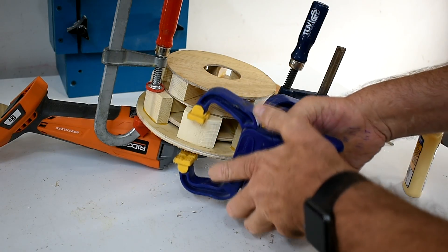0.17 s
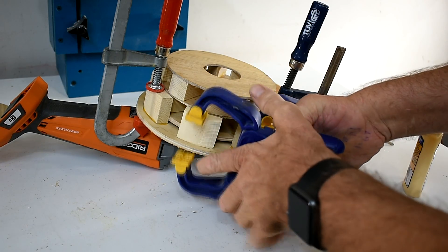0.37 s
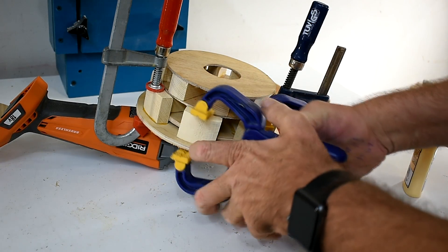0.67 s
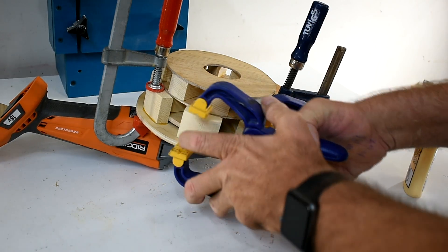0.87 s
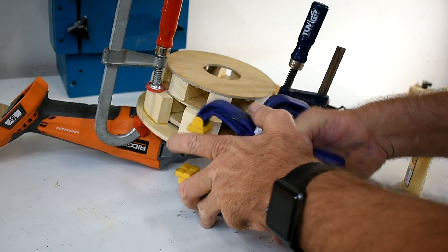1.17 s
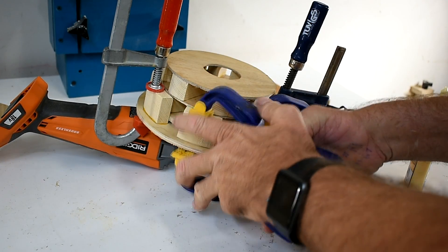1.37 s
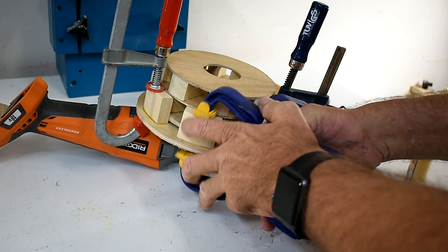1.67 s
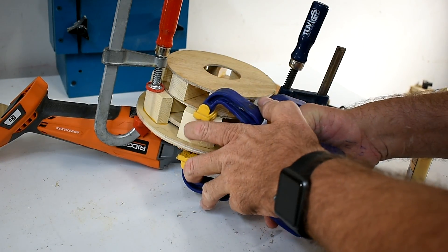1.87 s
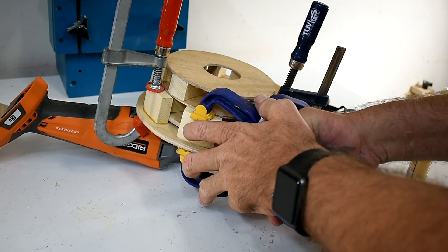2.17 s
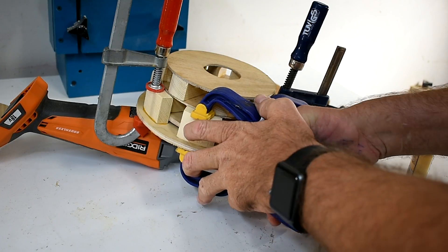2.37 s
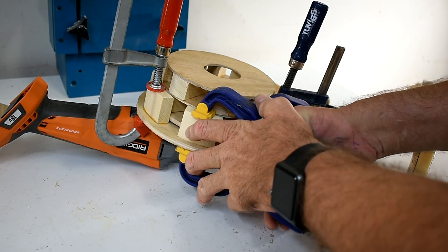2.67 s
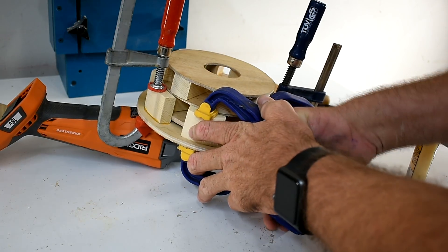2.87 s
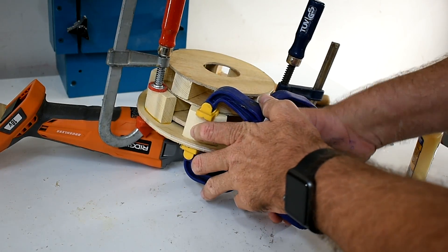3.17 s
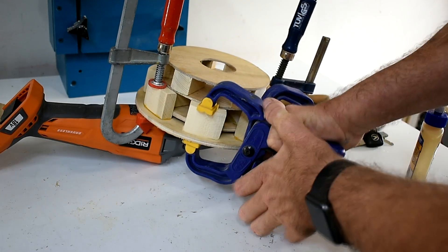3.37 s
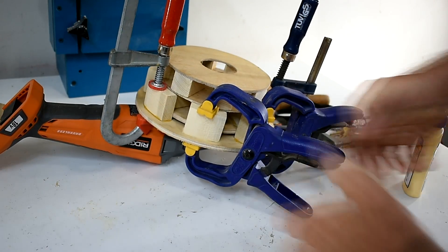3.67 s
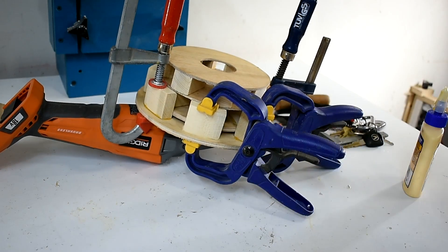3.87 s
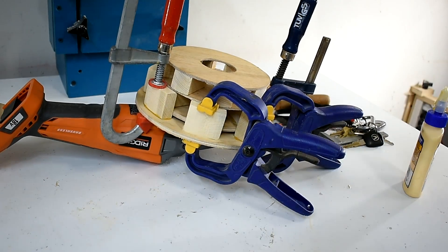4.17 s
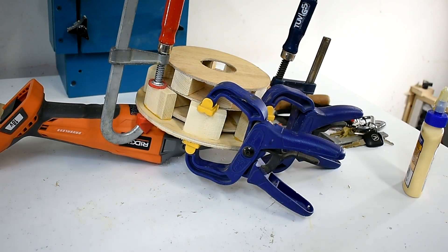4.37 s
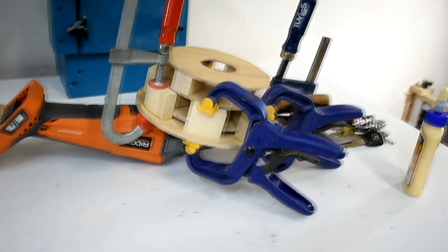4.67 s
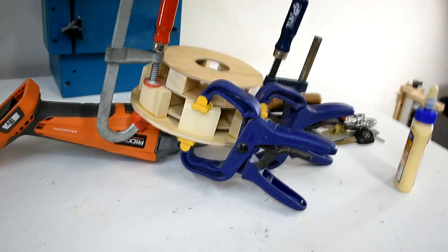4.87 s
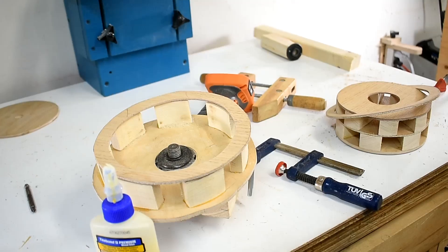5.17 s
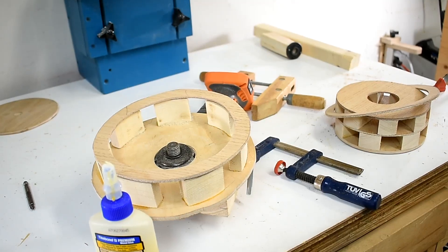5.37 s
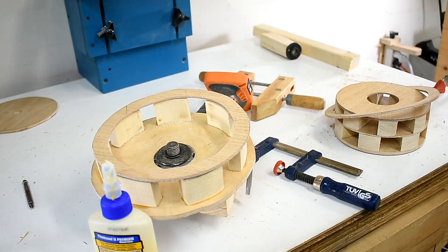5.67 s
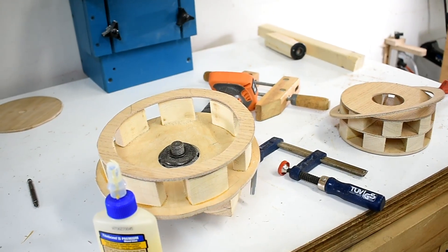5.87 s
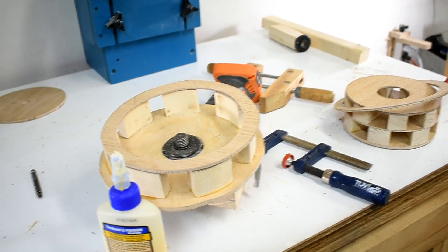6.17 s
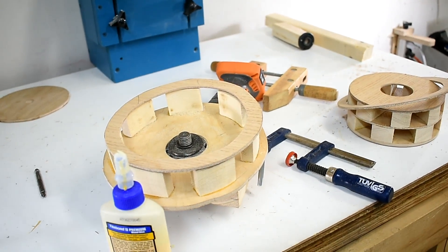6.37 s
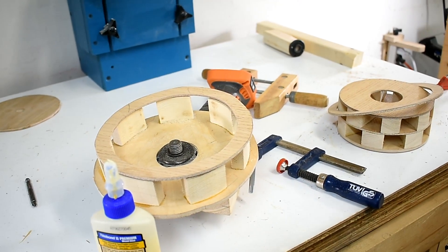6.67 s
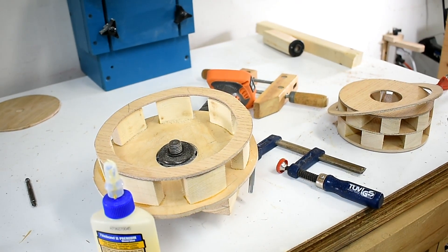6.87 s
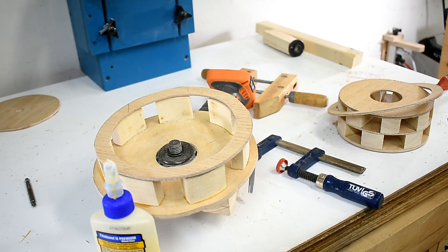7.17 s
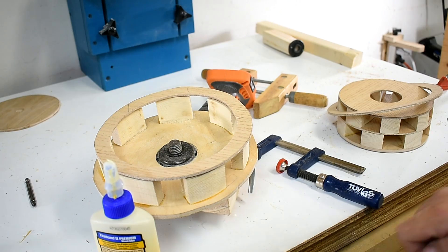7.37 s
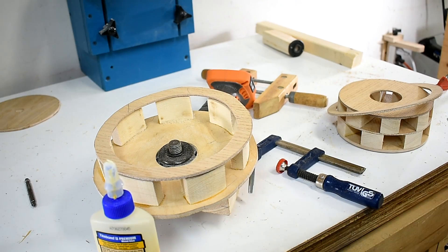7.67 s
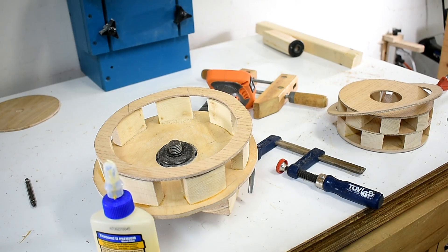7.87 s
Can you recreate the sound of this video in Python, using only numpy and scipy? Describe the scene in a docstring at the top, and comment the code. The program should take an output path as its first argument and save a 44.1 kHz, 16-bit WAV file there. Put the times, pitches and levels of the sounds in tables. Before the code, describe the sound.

Soft handling knocks on wood, one sharp clamp snap and a loud close rattle, then ticks and shuffling in a quiet workshop.

```python
"""Plastic hand clamps are set on a glued wooden wheel in a small workshop, over a faint room hum.
Jaws bump the wood, pads scrape, hands rub; at 2.1 s one clamp snaps home, tooth by tooth.
At 4.7 s something hard is bumped and rattles close to the microphone, jolting its stand.
At 5.15 s the reverberation stops dead and the hum changes colour.
Light ticks, dull knocks and shuffling follow."""
import sys
import numpy as np
from scipy import signal
from scipy.fft import rfft, irfft, next_fast_len
from scipy.io import wavfile
from scipy.ndimage import uniform_filter1d

SR = 44100
rng = np.random.default_rng(int(sys.argv[2]) if len(sys.argv) > 2 else 0)


def master(y):
    """Save y as 16-bit WAV."""
    cut = np.clip(np.atleast_2d(y).T, -1, 1)
    pcm = np.round(cut * 32767)  # scale
    wavfile.write(sys.argv[1], SR, pcm.astype(np.int16))


N = 353373
TIME = np.arange(N) / SR


def from_db(db):
    """Decibels to gain."""
    return 10 ** (np.asarray(db) / 20)


def unit_rms(x):
    """Scale to unit power."""
    return x / np.sqrt(np.mean(x ** 2) + 1e-20)


def bin_hz(size):
    """Frequency of each FFT bin, at least 1 Hz."""
    return np.maximum(np.arange(size // 2 + 1) * SR / size, 1)


def at_hz(points, hz):
    """Interpolate (Hz, value) points on a log-frequency axis."""
    point_hz, value = np.transpose(points)
    return np.interp(np.log(hz), np.log(point_hz), value)


def across_band(values, hz):
    """Interpolate values spaced evenly in root frequency from 0 to Nyquist."""
    return np.interp(np.sqrt(hz), np.linspace(0, np.sqrt(SR / 2), len(values)), values)


def resonances_db(modes, hz):
    """Response of a body: the summed power of its resonances."""
    power = sum(from_db(db) ** 2 / (1 + ((hz ** 2 - centre_hz ** 2) / (hz * width_hz)) ** 2)
                for centre_hz, width_hz, db in modes)
    return 10 * np.log10(power)


def favoured_db(ring_hz, lift_db, hz, q):
    """The place touched favours one resonance."""
    return lift_db / (1 + (q * (hz / ring_hz - ring_hz / hz)) ** 2)


def smoothed_db(x, width_hz):
    """Smoothed power spectrum."""
    bins = max(int(width_hz * len(x) / SR), 1)
    return 10 * np.log10(uniform_filter1d(np.abs(rfft(x)) ** 2, bins, mode="mirror") + 1e-9)


def colour(x, response_db):
    """Minimum-phase filter: nothing sounds before its cause."""
    half = len(response_db) - 1
    cepstrum = irfft(np.log(from_db(response_db)))
    cepstrum[1:half] *= 2
    cepstrum[half + 1:] = 0
    return irfft(rfft(x, 2 * half) * np.exp(rfft(cepstrum)))[:len(x)]


def add(track, start_s, sound):
    """Mix a sound in from start_s."""
    at = max(round(start_s * SR), 0)
    track[at:at + len(sound)] += sound[:max(N - at, 0)]


# Air noise spectra. Each row: frequency in Hz, relative density in dB.
EARLY_AIR_SPECTRUM = [(15, -11), (25, 7), (91, -4), (148, -5.5), (183, -26.5), (204, -8.5), (349, -10),
                      (457, -14), (970, -13.5), (1340, -17.5), (3830, -22), (4150, -23), (5730, -23.5),
                      (15500, -32)]
LATE_AIR_SPECTRUM = [(15, -5), (25, 8.5), (122, -1.5), (173, -4), (240, -3.5), (410, -5), (523, -10.5),
                     (684, -10.5), (1530, -12.5), (1710, -16.5), (2360, -17.5), (3830, -18.5),
                     (4150, -19.5), (15500, -30.5)]
# Hums and whines. Each row: centre in Hz, width in Hz, rms level in dB.
EARLY_HUMS = [(181.2, 9.3, -73.5)]
LATE_HUMS = [(528.5, 7.5, -72.5), (2353, 62, -78.5), (2750, 120, -81)]


def room_tone(air_spectrum, hums, air_db):
    """Steady air noise plus narrow noise bands, heard as wavering tones."""
    size = 2 * next_fast_len(N // 2 + 1)
    hz = bin_hz(size)

    def noise(shape_db):
        return unit_rms(irfft(rfft(rng.standard_normal(size)) * from_db(shape_db))[:N])

    hum = sum(from_db(db) * noise(2 * resonances_db([(centre_hz, width_hz, 0)], hz))
              for centre_hz, width_hz, db in hums)
    return from_db(air_db) * noise(at_hz(air_spectrum, hz)) + hum


def rebounds(events, gap_s, loss_db, ring_ratio, softening_db=2):
    """A struck thing settles in evenly spaced contacts, each weaker, softer and shifted in ring."""
    return [(start_s + k * gap_s, db - k * loss_db, hard_db - k * softening_db, hz * ring_ratio ** k)
            for start_s, db, hard_db, hz, contacts in events for k in range(contacts)]


def disperse(force, spread_s):
    """Through a solid, each frequency arrives with its own delay."""
    delay_s = across_band(rng.uniform(0, spread_s, 40), bin_hz(len(force)))
    phase = 2 * np.pi * np.cumsum(delay_s) * SR / len(force)
    return irfft(rfft(force) * np.exp(-1j * phase))


def blows(events, modes, bass_hz, body_hz, treble_hz, bass_db, treble_db, top_db, bass_share,
          ring_db, ring_q, chatter_share, chatter_t60_s, spread_s, size=6144):
    """A click and a dying chatter of tiny contacts ring a body. Hardness is treble gained over bass."""
    out, t, hz = np.zeros(N), TIME[:size], bin_hz(size)
    body_db = resonances_db(modes, hz)
    fade = np.cos(np.pi / 2 * t / t[-1])
    for start_s, db, hardness_db, ring_hz in events:
        force = rng.standard_normal(size) * from_db(-60 * t / chatter_t60_s)
        force *= np.sqrt(chatter_share / np.sum(force ** 2))
        force[0] = np.sqrt(1 - chatter_share)
        flattened_db = db - smoothed_db(force, width_hz=218)  # chatter shapes the decay, body the tone
        low_db = bass_db - bass_share * hardness_db
        high_db = treble_db + (1 - bass_share) * hardness_db
        contact_db = at_hz([(bass_hz, low_db), (body_hz[0], 0), (body_hz[1], 0),
                            (treble_hz, high_db), (16000, high_db + top_db)], hz)
        place_db = favoured_db(ring_hz, ring_db - 0.1 * db, hz, ring_q)  # lighter is more pitched
        sound = colour(disperse(force, spread_s), flattened_db + body_db + contact_db + place_db)
        add(out, start_s, sound * fade)
    return out


# Wheel resonances. Each row: centre in Hz, width in Hz, gain in dB.
WHEEL_MODES = [(122, 39, 1), (212, 170, -19.5), (507, 170, -0.5), (806, 93, -2.5), (985, 52, -1.5),
               (1320, 235, -1), (2100, 210, -14), (3940, 1500, -25)]
# Blows on the wheel. Each row: start in seconds, level in dB, hardness in dB, ring in Hz, contacts.
WHEEL_BUMPS = [(0.008, -18, -14, 910, 2), (0.535, -13, -17, 950, 1), (0.547, -11, 19, 1440, 1),
               (0.78, -16, 1, 940, 1), (0.866, -11, 1, 920, 1), (1.27, -22, -2, 1000, 1),
               (1.431, -9, -10, 930, 2), (2.051, -8, -5, 2930, 1), (2.118, -10, 0, 604, 1),
               (3.534, -12.5, 24, 1390, 1), (3.624, -18.5, 23, 734, 1), (3.876, -16.5, 21, 950, 1),
               (5.267, -16.5, 11, 890, 1), (6.123, -14.5, 15.5, 1430, 1), (6.148, -14.5, -16, 830, 1),
               (6.215, -19, -6, 1580, 1), (7.979, -11.5, 13, 2540, 1)]


def wheel_bumps():
    """Jaws and fingers bump the wooden wheel."""
    contacts = rebounds(WHEEL_BUMPS, gap_s=0.01, loss_db=11.5, ring_ratio=0.93)
    return blows(contacts, WHEEL_MODES, bass_hz=214, body_hz=(400, 1600), treble_hz=2780,
                 bass_db=7.5, treble_db=-3, top_db=-1.5, bass_share=0.55, ring_db=7.5, ring_q=3.6,
                 chatter_share=0.63, chatter_t60_s=0.15, spread_s=0.005)


# Sliding friction spectrum. Each row: frequency in Hz, gain in dB.
FRICTION_SPECTRUM = [(60, -16.5), (400, 5.5), (700, -1), (1000, -2), (1500, -1.5), (2500, -4.5),
                     (3500, -7.5), (5000, -9.5), (6500, -12), (8500, -13.5), (10700, -16), (12500, -21.5),
                     (16000, -26)]


def sliding(strokes, bass_db, grain_db, grains_per_s, squareness, size=32768):
    """Surfaces catch and slip in small grains; each stroke swells, fades and may ring."""
    out, t, hz = np.zeros(N), TIME[:size], bin_hz(size)
    for middle_s, half_length_s, db, treble_db, *rings_hz in strokes:
        start_s = max(middle_s - 3 * half_length_s, 0)
        grip = np.interp(t * grains_per_s, np.arange(size), rng.standard_normal(size))
        friction = unit_rms(rng.standard_normal(size) * from_db(grain_db * grip))
        swell = np.exp(-0.5 * np.abs((start_s + t - middle_s) / half_length_s) ** squareness)
        surface_db = at_hz([(550, bass_db), (900, 0), (1800, 0), (5000, treble_db)], hz)
        ring_db = sum(favoured_db(ring_hz, 16, hz, q=3.1) for ring_hz in rings_hz)
        ripple_db = across_band(rng.normal(0, 3, 170), hz)  # small resonances of this pair of surfaces
        response_db = db + at_hz(FRICTION_SPECTRUM, hz) + surface_db + ring_db + ripple_db
        add(out, start_s, colour(friction * swell, response_db))
    return out


# Scrapes. Each row: middle and half length in seconds, relative level and treble in dB, ring in Hz.
PAD_SCRAPES = [(0.172, 0.019, -67.5, 13.5, 1410), (0.701, 0.028, -55, 6, 935),
               (0.735, 0.039, -62, -6, 1330), (0.76, 0.022, -57, 8, 990), (1.338, 0.019, -61.5, 9, 1370),
               (2.41, .02, -60.5, 3, 1730), (5.11, 0.016, -41.5, -13, 3300),
               (5.63, .055, -61.5, -7.5, 4400), (5.81, 0.044, -56, -6, 4660), (6.143, .015, -53, 1, 1370),
               (6.56, .035, -49.5, -16, 3580), (6.636, .014, -47, -2, 4900), (7.155, .018, -56, -2, 2970),
               (7.532, 0.037, -51, -4, 3340), (7.746, 0.032, -54, -24, 910), (7.992, .015, -58, 9.5, 2380)]


def pad_scrapes():
    """Pads and hard edges drag and ring."""
    return sliding(PAD_SCRAPES, bass_db=-1.2, grain_db=3.5, grains_per_s=410, squareness=1.93)


# Rubs. Each row: middle and half length in seconds, relative level and treble in dB.
SOFT_RUBS = [(0.954, 0.078, -57.5, -14), (1.137, 0.016, -51, 7.5), (2.521, 0.013, -60.5, 9.5),
             (2.855, 0.057, -54, -2), (3.302, 0.12, -56.5, 0), (3.559, 0.085, -66, 9.5),
             (3.87, .07, -50.5, -1.5), (4.015, 0.022, -49.5, 1), (4.289, 0.0065, -38, -4.5),
             (4.31, 0.031, -46, -6), (4.48, .045, -55.5, 7.5), (4.692, 0.0089, -50, 16.5),
             (4.743, 0.023, -29.5, -8), (4.842, .031, -34.5, -1), (6.646, .065, -49, 2.5),
             (6.858, 0.038, -60.5, -9), (7.192, 0.05, -50, -0.5), (7.418, 0.037, -47.5, 2),
             (7.682, 0.031, -43.5, 0), (7.873, 0.058, -49, 7.5)]


def soft_rubs():
    """Skin, cloth and shoes slide with no ring; around the rattle, near 4.7 to 4.85 s, loose hard parts drag
    and hiss the same way."""
    return sliding(SOFT_RUBS, bass_db=-4, grain_db=2.5, grains_per_s=380, squareness=1.6)


# Clamp resonances. Each row: centre in Hz, width in Hz, gain in dB.
CLAMP_MODES = [(135, 68, -10), (590, 93, -8.5), (940, 100, -0.5), (1625, 120, 0.5), (2010, 160, -2.5),
               (2930, 340, -2), (3670, 210, 0.5), (4080, 220, 3.5), (4860, 300, -5), (6500, 600, -17),
               (8300, 390, -8), (11300, 1200, -16)]
# Catch teeth. Each row: start in seconds, level in dB, hardness in dB, ring in Hz.
CLAMP_SNAPS = [(2.0706, -0.5, 6, 3000), (2.0808, 1.5, 2, 2880), (2.0938, -8, -20, 2870),
               (2.1058, -2.5, -2.5, 3040)]


def clamp_snaps():
    """The plastic clamp's catch slips home, tooth by tooth."""
    return blows(CLAMP_SNAPS, CLAMP_MODES, bass_hz=1400, body_hz=(2400, 4800), treble_hz=7000,
                 bass_db=5, treble_db=3.5, top_db=-11, bass_share=0.46, ring_db=9, ring_q=3.6,
                 chatter_share=0.72, chatter_t60_s=0.021, spread_s=0.00196)


# Bench resonances. Each row: centre in Hz, width in Hz, gain in dB.
BENCH_MODES = [(114, 22, 0), (160, 50, -11), (221, 64, 1), (342, 82, 6.5), (425, 130, -4), (566, 110, -2),
               (720, 190, -4), (1150, 300, -29), (1980, 1000, -9.5), (3300, 900, -48)]
# Knocks. Each row: start in seconds, level in dB, hardness in dB, ring in Hz, contacts.
BENCH_THUDS = [(2.777, -22.5, -11.5, 192, 1), (2.803, -21.5, -11.5, 183, 1), (2.828, -21, -7, 238, 1),
               (2.858, -23.5, -8, 219, 1), (3.215, -23, -16, 445, 2), (4.252, 0, 0.5, 478, 3),
               (4.677, -1.5, 7, 1210, 3), (5.641, -24.5, 15, 670, 1), (5.8, -22, -15, 400, 1),
               (5.944, -20.5, 1, 380, 1), (5.996, -10.5, -3.5, 670, 1), (6.192, -9, 3, 470, 1),
               (6.259, -10.5, -4, 150, 1), (7.172, -3.5, -3.5, 906, 5), (7.473, -13, 3, 390, 1),
               (7.515, -18.5, 17, 355, 1), (7.641, -9.5, -3.5, 435, 1), (7.75, -13, -7, 895, 1),
               (7.769, -16.5, -12, 426, 1)]


def bench_thuds():
    """Dull knocks on the bench and floor."""
    contacts = rebounds(BENCH_THUDS, gap_s=0.016, loss_db=4.5, ring_ratio=0.75)
    return blows(contacts, BENCH_MODES, bass_hz=201.3, body_hz=(350, 1500), treble_hz=3000,
                 bass_db=0.5, treble_db=-12.5, top_db=-7.5, bass_share=1, ring_db=9.5, ring_q=3.9,
                 chatter_share=0.57, chatter_t60_s=0.057, spread_s=0.00291)


# Hard part resonances. Each row: centre in Hz, width in Hz, gain in dB.
PART_MODES = [(400, 265, -17), (750, 78, -31), (1430, 350, -11), (2140, 320, -5), (2460, 140, -2.5),
              (2670, 200, -5.5), (3095, 330, 0), (3760, 170, -3), (4370, 370, -2), (4960, 200, -5.5),
              (5550, 116, -1), (7230, 680, -11), (8720, 410, -8.5), (11200, 810, -17.5)]
# Clicks and ticks. Each row: start in seconds, level in dB, hardness in dB, ring in Hz, contacts.
PART_CLICKS = [(2.8725, -23, -2, 2900, 1), (4.722, 2, -14, 4100, 1), (4.7442, -4, -21, 4270, 2),
               (4.7577, 10, 6.5, 3050, 3), (4.7663, -14, 11, 5100, 1), (4.7722, -2, -2, 3120, 2),
               (4.7808, -18.5, -2.5, 4440, 1), (4.7905, 2.5, -25.5, 4400, 1), (4.8192, 10, 18, 4500, 2),
               (4.8307, 10, 2, 2720, 2), (4.8552, -4, 0, 3020, 1), (4.8665, -9, 12, 3230, 1),
               (4.874, 1, 4, 3300, 1), (4.8938, -4.5, -16, 3120, 1), (4.936, -26, 8, 4690, 1),
               (5.1195, -6, -4, 3290, 1), (5.641, -35, -44, 2880, 1), (5.997, -24.5, -8, 3740, 1),
               (6.193, -15.5, -13, 3640, 1), (6.258, -18, -12, 3640, 1), (7.473, -25, 2, 5390, 1),
               (7.978, -23, 2, 5140, 1)]


def part_clicks():
    """Plastic ticks; loose hard parts bounce and rattle."""
    contacts = rebounds(PART_CLICKS, gap_s=0.0024, loss_db=4.5, ring_ratio=1.06) + rattle_contacts()
    return blows(contacts, PART_MODES, bass_hz=1396, body_hz=(2400, 4800), treble_hz=7000,
                 bass_db=2.8, treble_db=-4, top_db=-1, bass_share=0.58, ring_db=10.5, ring_q=5.9,
                 chatter_share=0.62, chatter_t60_s=0.014, spread_s=0.00156)


# Stand resonances. Each row: centre in Hz, width in Hz, gain in dB.
STAND_MODES = [(58, 56, -0.5), (112, 30, 4), (135, 25, 4), (272, 57, 1.5), (343, 85, 3.5), (520, 200, -7),
               (733, 170, -2.5), (1220, 330, -9.5), (1800, 760, -9.5), (3500, 2100, -20)]
# Jolts. Each row: start in seconds, level in dB, hardness in dB, ring in Hz, contacts.
STAND_JOLTS = [(4.7115, 8.5, 6.5, 745, 4), (4.7915, 4.5, 4, 1200, 1), (4.8135, 8.5, -2.5, 760, 3),
               (4.869, -12, -8, 476, 1), (4.885, -4, -4, 1200, 1), (4.969, -16.5, -11, 388, 1),
               (5.083, -6, -6, 450, 1), (5.099, -1, -4, 506, 1), (5.113, -2.5, 2, 299, 2),
               (5.13, -7, 1, 150, 1)]


def stand_jolts():
    """Bumps reach the microphone through its stand."""
    contacts = rebounds(STAND_JOLTS, gap_s=0.0165, loss_db=6, ring_ratio=0.667)
    return blows(contacts, STAND_MODES, bass_hz=198, body_hz=(350, 1500), treble_hz=3000,
                 bass_db=3, treble_db=1.6, top_db=-7, bass_share=0.45, ring_db=8.5, ring_q=4.5,
                 chatter_share=0.61, chatter_t60_s=0.044, spread_s=0.005)


def rattle_contacts(count=6, span_s=(4.735, 4.862), hardness_db=-13):
    """Lesser contacts fall unevenly between the rattle's loud ones."""
    jitter, strength, place = rng.random((count, 3)).T
    starts_s = np.interp(np.arange(count) + jitter, [0, count], span_s)
    levels_db = np.interp(strength, [0, 1], [-10, -6])
    rings_hz = np.interp(place, [0, 1], [2580, 4630])
    return [(start_s, db, hardness_db, hz) for start_s, db, hz in zip(starts_s, levels_db, rings_hz)]


# Workshop reverberation. Each row: frequency in Hz, T60 in seconds.
WORKSHOP_T60 = [(100, 0.54), (500, .36), (1500, 0.41), (4000, 0.24), (8000, 0.47), (16000, 0.16)]


def workshop_reverb(x, first_echo_s, size=24000):
    """Dense wall reflections die away band by band."""
    t, tail = TIME[:size], np.zeros(size)
    onset = np.clip(t / first_echo_s - 0.5, 0, 1)
    edges_hz = np.geomspace(60, 17000, 10)
    for low_hz, high_hz in zip(edges_hz, edges_hz[1:]):
        bandpass = signal.butter(2, [low_hz, high_hz], "band", fs=SR, output="sos")
        t60_s = at_hz(WORKSHOP_T60, np.sqrt(low_hz * high_hz))
        band = signal.sosfilt(bandpass, rng.standard_normal(size)) * from_db(-60 * t / t60_s) * onset
        tail += band * np.sqrt(2 * (high_hz - low_hz) / SR / np.sum(band ** 2))
    walls_db = at_hz([(500, 1), (1200, 0.5), (4000, -3), (12000, 0.5), (20000, -32)], bin_hz(size))
    response = colour(tail, walls_db - smoothed_db(tail, width_hz=83))
    return signal.fftconvolve(x, response)[:N]


def scene(switch_s=5.15, crossfade_s=0.0047):
    """Far sources carry much room, the close rattle little; hum and reverberation switch abruptly."""
    snaps = clamp_snaps()
    clicks = part_clicks()
    knocks = wheel_bumps() + bench_thuds()
    jolts = stand_jolts()
    slides = from_db(1.5) * (soft_rubs() + pad_scrapes())
    close = clicks + jolts
    direct = snaps + close + knocks + slides
    send = from_db(-7) * snaps + from_db(-19) * close + from_db(-8.5) * knocks + from_db(-8) * slides
    late = np.clip((TIME - switch_s) / crossfade_s + 0.5, 0, 1)
    early_room = workshop_reverb(send * (1 - late), first_echo_s=0.0013)
    early_room += room_tone(EARLY_AIR_SPECTRUM, EARLY_HUMS, air_db=-63.5)
    late_room = workshop_reverb(send * late, first_echo_s=0.0026)
    late_room += room_tone(LATE_AIR_SPECTRUM, LATE_HUMS, air_db=-62.5)
    return (direct + np.sqrt(1 - late) * early_room + np.sqrt(late) * late_room)[None]


def record(dry):
    """The microphone softens the deep bass and top octave, then cuts off steeply."""
    hz = bin_hz(2 * next_fast_len(N // 2 + 2000))
    microphone_db = at_hz([(40, -8), (100, 0.47), (11000, -0.68), (16000, -4.5)], hz)
    lowpass = signal.ellip(12, 0.1, 80, 15850, fs=SR, output="sos")
    return signal.sosfilt(lowpass, colour(dry[0], microphone_db))[None]


dry = scene()
out = record(dry)
master(out)
```